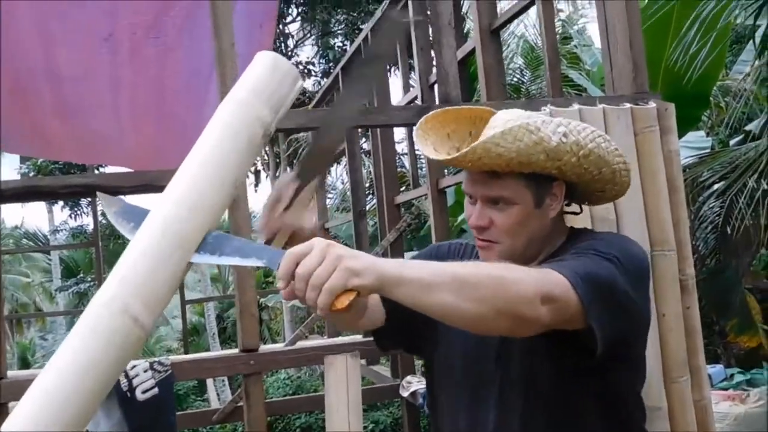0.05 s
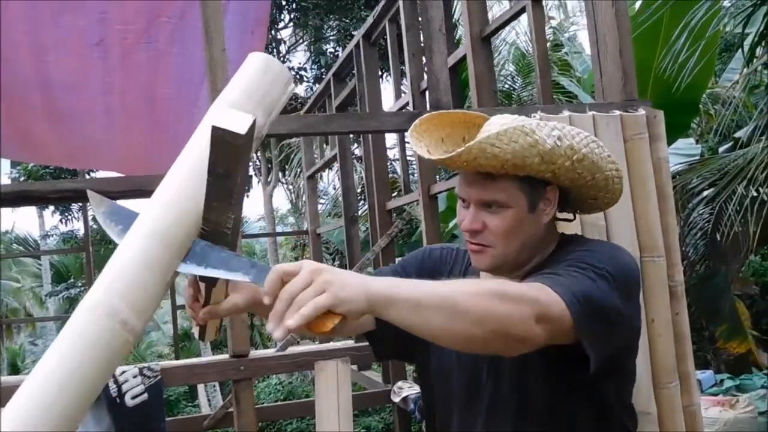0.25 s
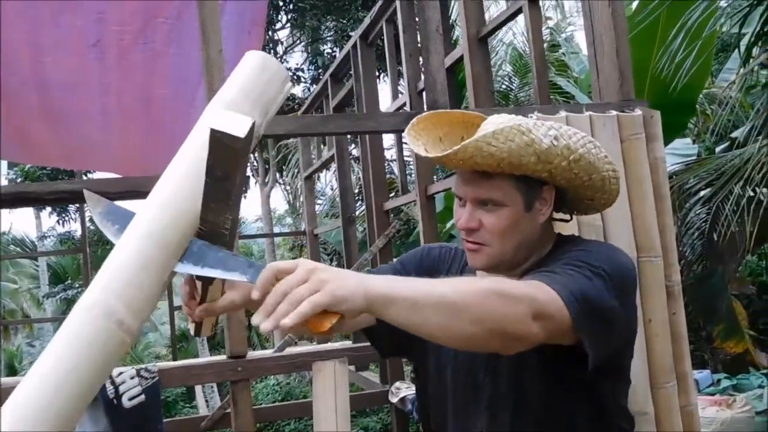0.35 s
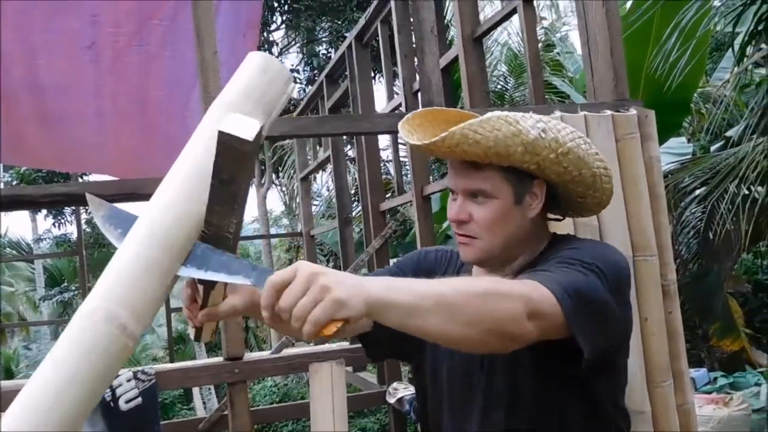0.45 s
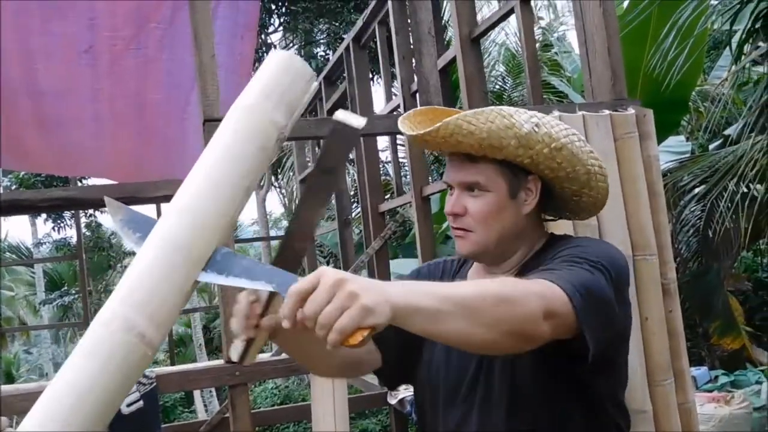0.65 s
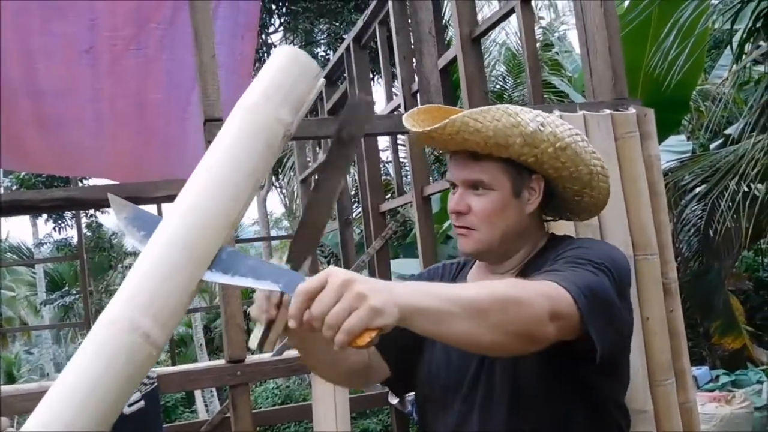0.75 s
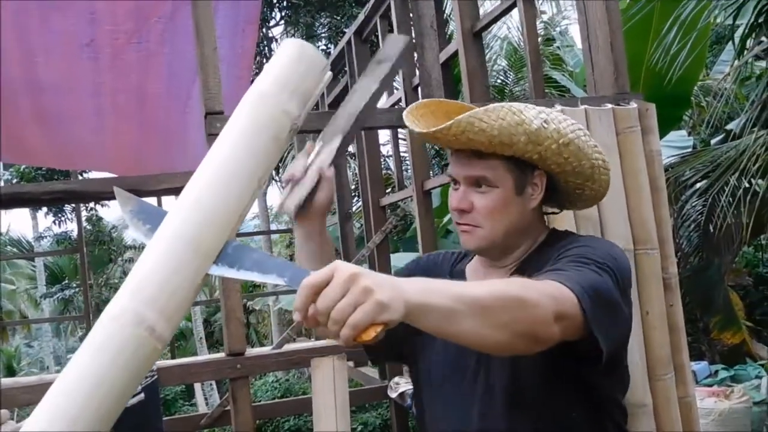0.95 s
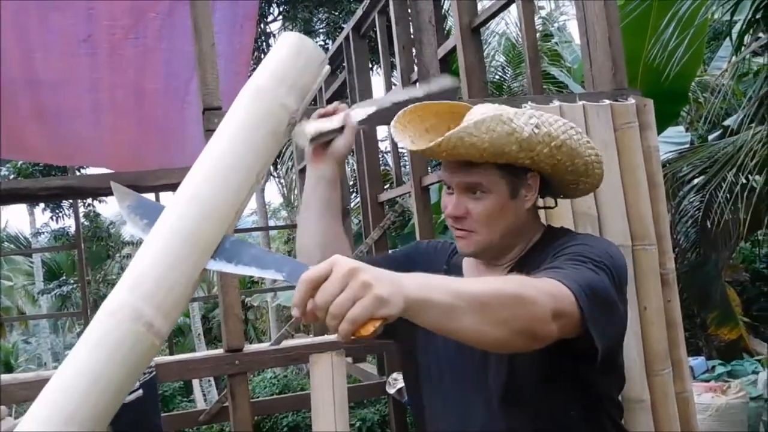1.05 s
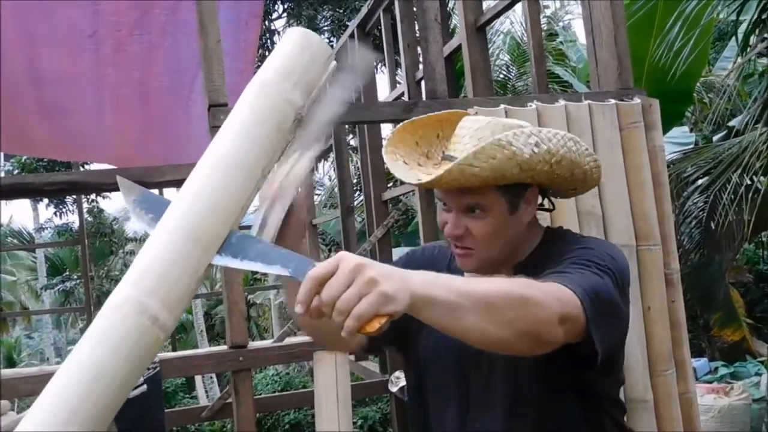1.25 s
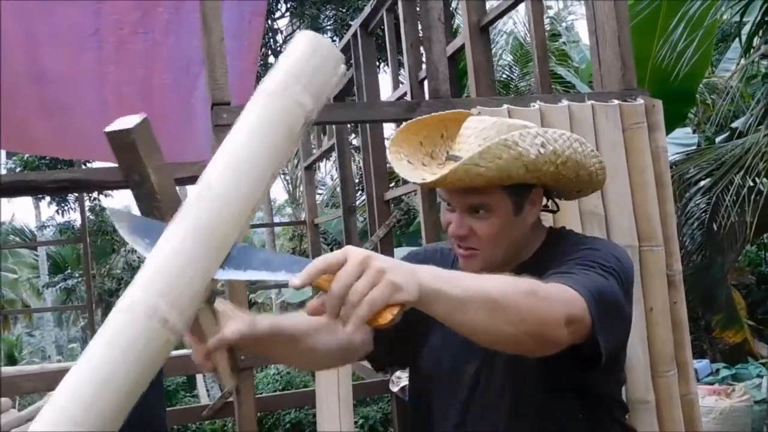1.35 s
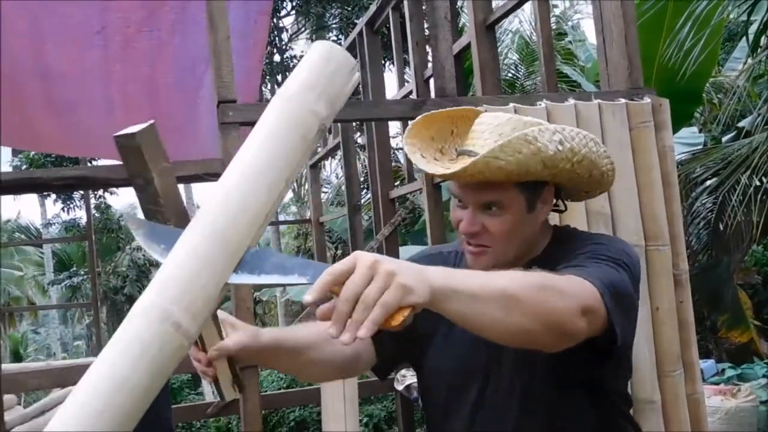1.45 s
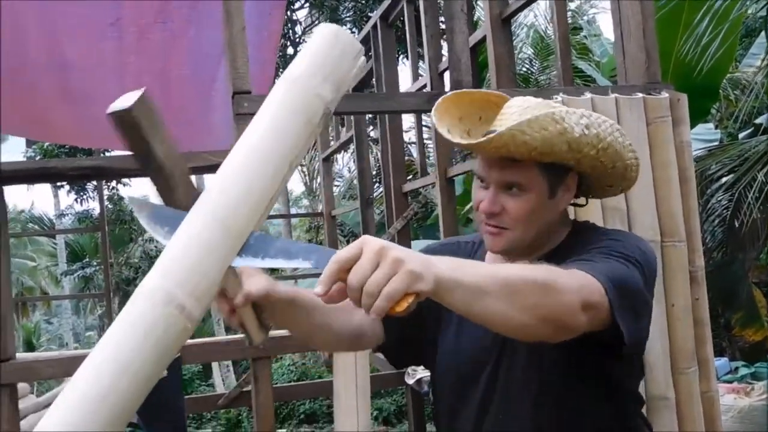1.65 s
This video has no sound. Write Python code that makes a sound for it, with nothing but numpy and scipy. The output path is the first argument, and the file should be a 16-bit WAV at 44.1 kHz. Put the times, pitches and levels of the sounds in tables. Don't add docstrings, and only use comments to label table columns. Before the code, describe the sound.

A wooden block strikes a knife back in bamboo, cracking and ringing briefly, then strikes again brighter after a pause with soft rustle and a tiny tick; open outdoor yard, close microphone distorting on the peaks.

```python
import sys
import numpy as np
from scipy import signal
from scipy.io import wavfile

SR = 44100
rng = np.random.default_rng(int(sys.argv[2]) if len(sys.argv) > 2 else 0)


def makeup_ratio(level_db):
    decades = np.asarray(level_db, float) / 20
    return 10 ** decades


def wrap_up_sound(samples):
    columns = np.atleast_2d(samples).T
    tamed = np.clip(columns, -1, 1)
    steps = np.round(tamed * 32767).astype(np.int16)
    wavfile.write(sys.argv[1], SR, steps)


N = 74970


def in_time(rows):
    s, value = np.transpose(rows)
    return np.interp(np.arange(N) / SR, s, value)


def at_hz(points, hz):
    table_hz, value = np.transpose(points)
    return np.interp(np.log(hz), np.log(table_hz), value)


def rms_one(x):
    return x / np.sqrt(np.mean(x ** 2) + 1e-20)


def filtered(x, order, hz, kind):
    return signal.sosfilt(signal.butter(order, hz, kind, fs=SR, output="sos"), x)


def pan(db):
    return makeup_ratio(db * np.array([[.5], [-.5]]))


def click(s):
    return np.arange(N) == int(s * SR)


def drift(rate):
    r = np.exp(-2 * np.pi * rate * 40 / SR)
    noise = rng.standard_normal(N // 40 + 2002)
    slow = signal.lfilter([1], [1, -2 * r, r * r], noise)[2000:]
    return np.interp(np.arange(N) / 40, np.arange(len(slow)), rms_one(slow))


def ring(clicks, hz, t60):
    r, w = makeup_ratio(-60 / (t60 * SR)), 2 * np.pi * hz / SR
    return signal.lfilter([0, np.sin(w)], [1, -2 * r * np.cos(w), r * r], clicks + 1e-18)


def dying(start_s, t60):
    age = np.arange(N) / SR - start_s
    return (age >= 0) * makeup_ratio(-60 * np.maximum(age, 0) / t60)


def bands(spectrum, likeness, patchy_db):
    edges = 20 * 2 ** np.arange(0, 10.1, .5)
    white = rng.standard_normal((2, 2, N + 8000))
    together = drift(3.0)
    out = []
    for k, (low, high) in enumerate(zip(edges, edges[1:])):
        mid, side = filtered(white[k % 2], 2, [low, high], "band")[:, -N:]
        hz = np.sqrt(low * high)
        alike = np.clip(at_hz(likeness, hz), -1, 1)
        gain = makeup_ratio(at_hz(spectrum, hz) + patchy_db * (1.04 * together + drift(14)))
        stereo = np.sqrt(1 + alike) * mid + np.sqrt(1 - alike) * side * [[1], [-1]]
        out.append((hz, gain * stereo))
    total = np.sqrt(np.mean(sum(x for _, x in out) ** 2))
    return [(hz, x / total) for hz, x in out]


# [f/Hz, level/dB per Hz]
YARD_COLOUR = [(12, -29), (20, 0.5), (177, -7.5), (204, -12), (285, -9), (1480, -10.5), (2320, -16.5),
               (10500, -32), (16000, -33)]
# [f/Hz, likeness -1 to 1]
YARD_LIKENESS = [(60, 0.8), (240, 0.3), (950, -0.11), (3770, -0.08), (15000, -0.0)]


def yard():
    return makeup_ratio(-48.5) * sum(x for _, x in bands(YARD_COLOUR, YARD_LIKENESS, patchy_db=.7))


def insects():
    centre_hz, width_hz, level_db = 10700, 900, -67.5
    noise = rng.standard_normal((2, N))
    for _ in range(2):
        noise = ring(noise, centre_hz, np.log(1000) / np.pi / width_hz)
    return makeup_ratio(level_db + 1.5 * drift(8.0)) * rms_one(noise)


# [t/s, level/dB]
RUSTLE_LEVEL = [(0, -62), (.07, -50), (.19, -59.5), (.55, -76), (.66, -62), (.73, -52.5), (.81, -55),
                (.87, -66), (1.2, -77), (1.25, -55), (1.38, -61), (1.56, -48), (1.7, -62)]
# [f/Hz, level/dB per Hz]
RUSTLE_COLOUR = [(300, -27), (2500, -1), (7000, -13), (15000, -18.5)]


def rustle():
    rubbing = sum(x for _, x in bands(RUSTLE_COLOUR, YARD_LIKENESS, patchy_db=1.5))
    return makeup_ratio(in_time(RUSTLE_LEVEL)) * rubbing


# [t/s, snap level/dB, ring f/Hz, ring level/dB, left over right level/dB]
TICKS = [
    (.066, -63, 12100, -64, -2),
    (.455, -58, 12880, -64, 3),
    (0.7224, -40, 9800, -55, 0),
    (1.2344, -41.5, 3020, -39, 2),
    (1.697, -57, 9200, -55, .1),
]


def ticks():
    snap_t60_s, ring_t60_s = .025, .03
    hiss = filtered(rng.standard_normal((3, N)), 2, 2000, "high")
    out = np.zeros((2, N))
    for s, db, hz, ring_db, pan_db in TICKS:
        snap = (hiss[0] + .7 * hiss[1:]) * dying(s, snap_t60_s)
        tone = ring(click(s), hz, ring_t60_s)
        tone = tone + .42 * ring(click(s), .77 * hz, ring_t60_s)
        out += pan(pan_db) * (makeup_ratio(db) * snap + makeup_ratio(ring_db) * tone)
    return out


# [t/s, level/dB, low f/Hz, high f/Hz, length/s]
BUMPS = [
    (.2, -38, 20, 60, .035),
    (.203, -30, 60, 350, .02),
    (.215, -34, 280, 500, .04),
    (.25, -44, 200, 500, .055),
    (1.394, -35, 20, 60, .032),
    (1.396, -28, 50, 200, .022),
    (1.44, -26, 420, 950, .052),
    (1.444, -32, 160, 330, .028),
]


def bumps():
    out, noise = np.zeros((2, N)), rng.standard_normal((3, N))
    for s, db, low_hz, high_hz, length in BUMPS:
        dull = filtered(noise[0] + .3 * noise[1:], 2, [low_hz, high_hz], "band")
        swell = dull * np.sin(np.pi * np.clip((np.arange(N) / SR - s) / length, 0, 1))
        out += makeup_ratio(db) * rms_one(swell) * np.sqrt(length * SR / N)
    return out


# [t/s, strength level/dB, hardness as cut-off f/Hz, crack level/dB]
FIRST_CONTACTS = [
    (.2013, -5, 4000, -25.5),
    (.2024, 1.5, 7000, -16.5),
    (.2066, 1.5, 1600, -29.5),
    (.208, -6, 7000, -14),
    (.2125, -12.5, 2500, -19),
    (.2175, -13.5, 4000, -26.5),
    (.262, -30, 2504, -44),
    (.322, -44, 1500, -44),
]
SECOND_CONTACTS = [
    (1.3978, 2.5, 8420, -6.5),
    (1.3995, -5.5, 3504, -9.5),
    (1.4045, -2, 3500, -11.5),
    (1.4385, -27, 1470, -43),
    (1.4495, -13.5, 970, -36),
    (1.463, -24.5, 953, -40),
]
# [f/Hz, level/dB, t60/s]
FIRST_MODES = [(628.6, -7, .11), (714, -8, .19), (754, -31.5, .55), (781, -2.5, .05), (943.5, -5.5, .08),
               (1080, -17.5, 0.034), (1480, -7.5, 0.086), (1620, -9, .05), (1767, -6, 0.022),
               (2160, -13, .07), (2463, -9.5, 0.042), (2697, -11.5, 0.042), (2900, -17, 0.054),
               (3300, -10.5, .04)]
SECOND_MODES = [(373, -22, 0.088), (553, -21.5, 0.14), (654, -10, 0.073), (823, -9, 0.079), (914, -20, .12),
                (1083, -15, 0.088), (1478, -3, 0.03), (1522, -22, 0.72), (1542.4, -11, .1),
                (1947, -12, .045), (2433, -22, .09), (2620, -10.5, 0.041), (3462, -8, 0.033),
                (4332, -5, 0.021)]


def blow(contacts, modes, crack_pan_db):
    strike_spread_db, mode_pan_db, waver_db = 2.0, 2.5, 3.0
    hiss = rng.standard_normal((3, N))
    hiss = filtered(hiss[0] + .9 * hiss[1:], 2, 1900, "high")
    out, pushes = np.zeros((2, N)), []
    for s, db, cut_hz, crack_db in contacts:
        r = np.exp(-2 * np.pi * cut_hz / SR)
        push = signal.lfilter([(1 - r) ** 2], [1, -2 * r, r * r], makeup_ratio(db) * click(s) + 1e-18)
        pushes.append(filtered(push, 2, .18 * cut_hz, "high"))
        crack = signal.lfilter([1 - r], [1, -r], hiss * dying(s, .022) + 1e-18)
        out += makeup_ratio(crack_db) * pan(crack_pan_db) * crack
    chance = rng.standard_normal((len(modes), len(contacts)))
    drives = makeup_ratio(strike_spread_db * chance) @ pushes
    for k, ((hz, db, t60), drive) in enumerate(zip(modes, drives)):
        waver = waver_db * drift(14.0)
        rung = (-1) ** k * makeup_ratio(db + waver) * ring(drive, hz, t60)
        out += pan(mode_pan_db * rng.standard_normal()) * rung
    return out


# [f/Hz, level/dB per Hz]
FIRST_SCATTER = [(24, -95), (40, -48), (118, -14), (402, -33.5), (697, 1), (1240, -6.5), (1410, -10),
                 (2500, -10), (16000, -42.5)]
SECOND_SCATTER = [(24, -55), (40, -25), (329, -19.5), (556, -3.5), (1240, -2.5), (1520, -5.5), (1850, -6.5),
                  (4930, -17), (16000, -34.5)]
# [f/Hz, t60/s]
NEAR_T60 = [(100, .2), (700, 0.12), (3000, 0.14), (12000, 0.12)]
# [f/Hz, likeness -1 to 1]
SCATTER_LIKENESS = [(60, 0.8), (240, 0.92), (950, 1), (3770, 0.33), (15000, 0.01)]


def scatter(spectrum, start_s, level_db):
    rise_s, far_db, far_t60_s = .0025, -16.5, .67
    rise = 1 - dying(start_s, rise_s * np.log(1000))
    far = makeup_ratio(far_db) * dying(start_s, far_t60_s)
    tail = np.zeros((2, N))
    for hz, x in bands(spectrum, SCATTER_LIKENESS, patchy_db=.6):
        near = dying(start_s, at_hz(NEAR_T60, hz))
        tail += x * (near + far)
    return makeup_ratio(level_db) * rise * tail


def echoes(x):
    level_db, gap_s, early_t60_s = -17, .0068, .15
    late_db, late_t60_s, alike = -4, .55, .2
    noise = rng.standard_normal((3, N))
    fall = dying(gap_s, early_t60_s) + makeup_ratio(late_db) * dying(gap_s, late_t60_s)
    paths = (np.sqrt(alike) * noise[0] + np.sqrt(1 - alike) * noise[1:]) * fall
    paths /= np.sqrt(np.sum(fall ** 2))
    return makeup_ratio(level_db) * signal.fftconvolve(x, paths, axes=1)[:, :N]


def lead_in():
    start_s, end_s, hz, end_db, growth_db_per_s = 1.3935, 1.3979, 690, -7, 3200
    age = np.arange(N) / SR - start_s
    left = end_s - start_s - age
    swell = makeup_ratio(end_db - growth_db_per_s * np.maximum(left, 0))
    return (age > 0) * (left > 0) * swell * -np.sin(2 * np.pi * hz * age)


def scene():
    knocks = blow(FIRST_CONTACTS, FIRST_MODES, crack_pan_db=2.0)
    knocks = knocks + blow(SECOND_CONTACTS, SECOND_MODES, crack_pan_db=3.0) + lead_in()
    tails = scatter(FIRST_SCATTER, start_s=.204, level_db=-9.5)
    tails = tails + scatter(SECOND_SCATTER, start_s=1.399, level_db=-10.5)
    around = yard() + insects() + rustle() + ticks() + bumps() + tails
    return makeup_ratio(0.5) * knocks + echoes(knocks) + around * pan(1.3)


def roll_off(x):
    return signal.sosfilt(signal.butter(12, 16380, fs=SR, output="sos"), x)


def record(dry):
    top, knee = .97, 4.0
    x = dry / (1 + np.abs(dry / top) ** knee) ** (1 / knee)
    x = filtered(x, 1, 24.5, "high")
    x = signal.sosfilt(signal.cheby2(10, 50, 16100, fs=SR, output="sos"), x)
    return roll_off(np.clip(x, -1, 1))


dry = scene()
out = record(dry)
wrap_up_sound(out)
```